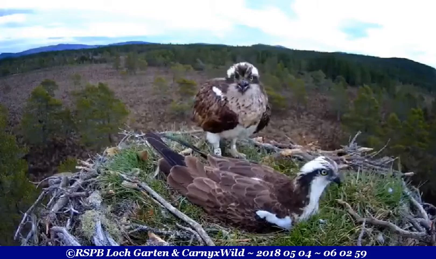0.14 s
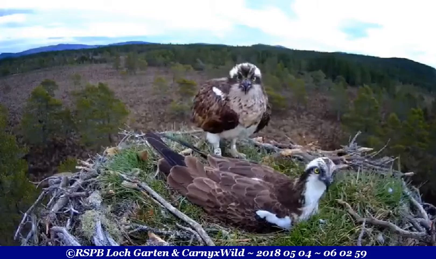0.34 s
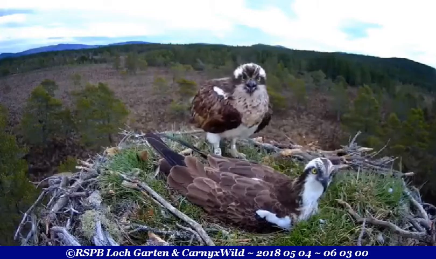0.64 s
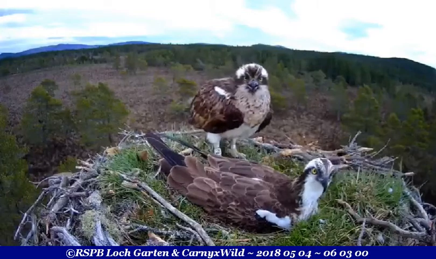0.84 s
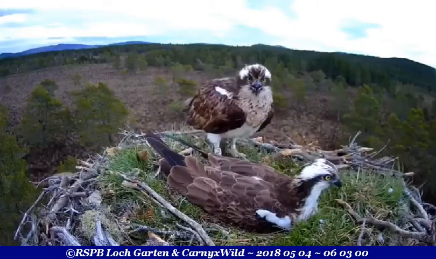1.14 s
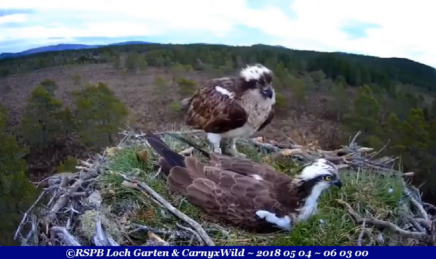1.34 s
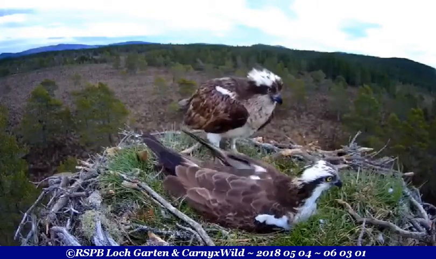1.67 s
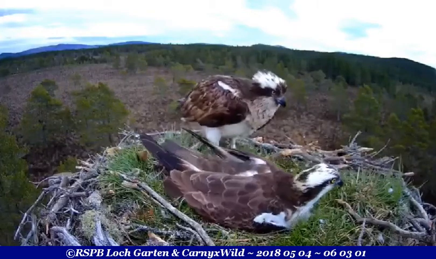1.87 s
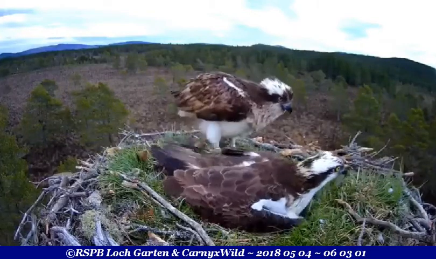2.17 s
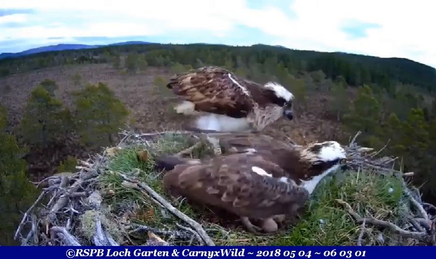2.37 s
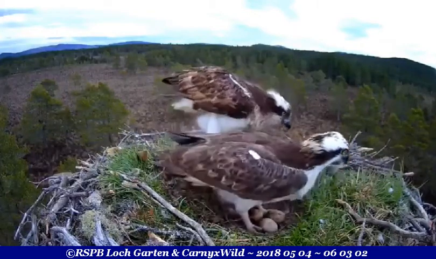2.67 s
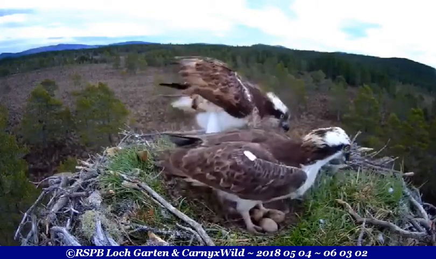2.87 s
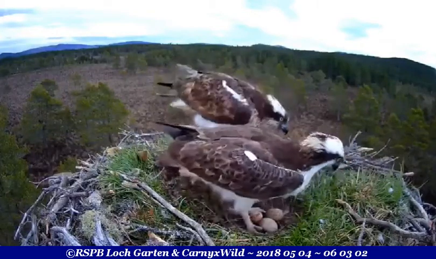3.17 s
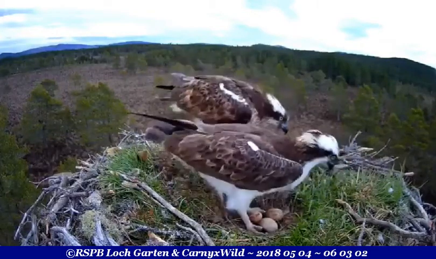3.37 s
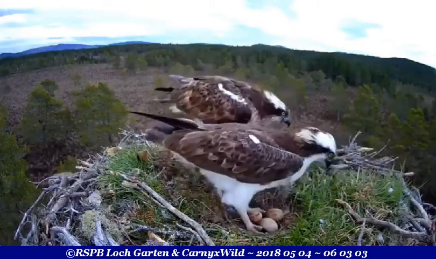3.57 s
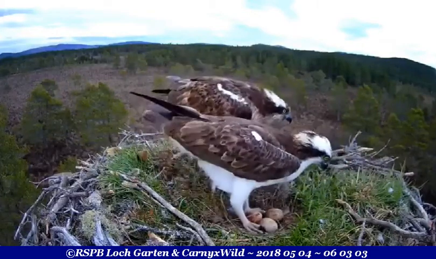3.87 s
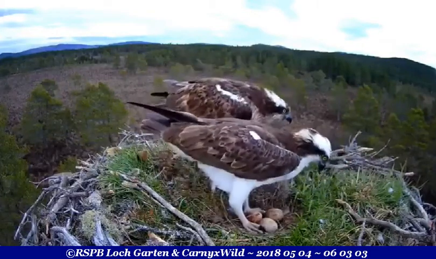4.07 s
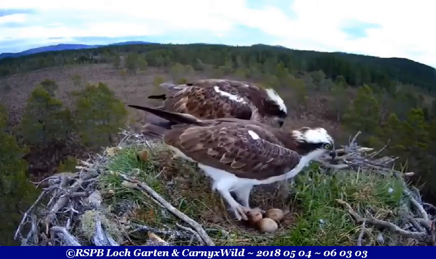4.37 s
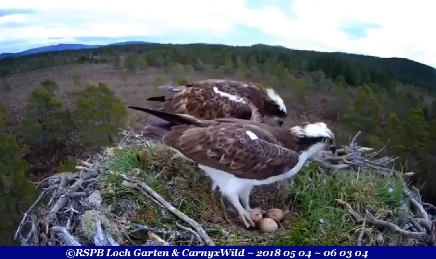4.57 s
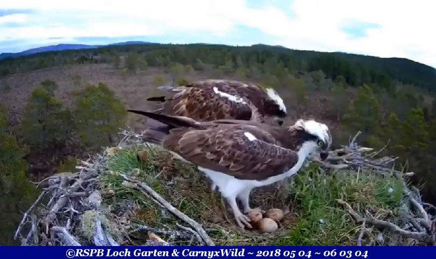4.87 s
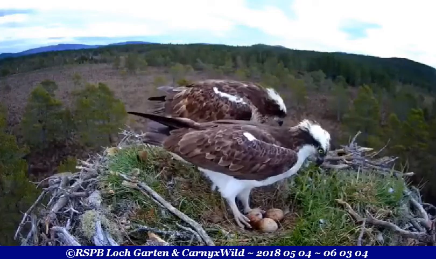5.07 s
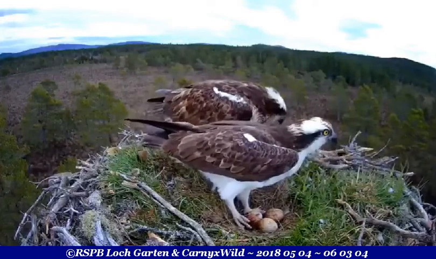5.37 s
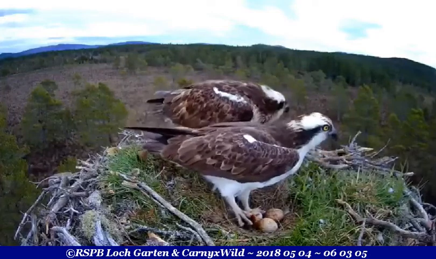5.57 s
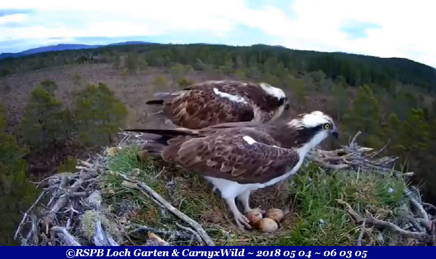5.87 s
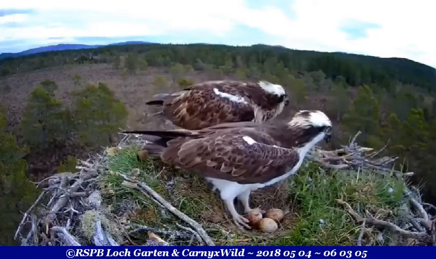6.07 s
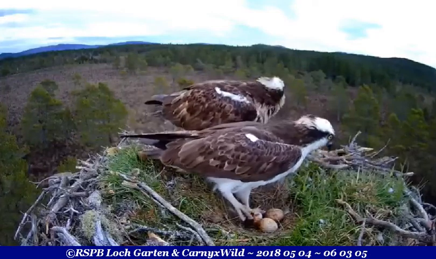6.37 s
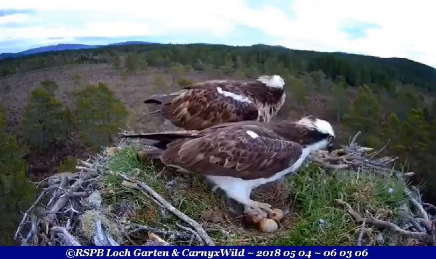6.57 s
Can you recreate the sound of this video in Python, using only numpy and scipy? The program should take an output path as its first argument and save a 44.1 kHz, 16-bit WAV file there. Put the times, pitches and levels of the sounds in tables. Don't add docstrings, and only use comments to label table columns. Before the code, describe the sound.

Short loud bird pips fade into strained little chirps, then distant sliding whistles echo among trees over steady low buzz, rumble and thin electronic whine.

```python
import sys
import numpy as np
from scipy import signal
from scipy.fft import rfft, irfft, next_fast_len
from scipy.io import wavfile
from scipy.ndimage import uniform_filter1d, map_coordinates

SR = 44100
rng = np.random.default_rng(int(sys.argv[2]) if len(sys.argv) > 2 else 0)


def voltage_ratio(decibels):
    exponent = np.asarray(decibels, float) / 20
    return 10 ** exponent


def unload_audio(sound):
    columns = np.transpose(np.atleast_2d(sound))
    steps = np.round(np.clip(columns, -1, 1) * 32767)
    wavfile.write(sys.argv[1], SR, steps.astype(np.int16))


N = 295911
TIME = np.arange(N) / SR

# t/s, level/dB
BACKGROUND_GAIN = [(0, 0.5), (.2, -1), (.6, -0.5), (.9, -2), (1.3, -1.5), (2.5, -1), (3.8, -0.5), (4.6, 0),
                   (6.71, 1.5)]


def unit(x):
    return x / np.sqrt(np.mean(x ** 2) + 1e-20)


def curve(rows):
    return np.interp(TIME, *np.transpose(rows))


def wobble(rate_hz):
    knots = rng.standard_normal(int(N * rate_hz / SR) + 4)
    return map_coordinates(knots, [TIME * rate_hz])


def noise(spectrum):
    m = next_fast_len(N)
    hz, db = np.transpose(spectrum)
    log_hz = np.log(np.fft.rfftfreq(m, 1 / SR) + 1)
    gain = voltage_ratio(np.interp(log_hz, np.log(hz), db))
    return unit(irfft(rfft(rng.standard_normal(m)) * gain, m)[:N])


def rumble_and_hiss():
    # f/Hz, level/dB per Hz
    line_noise = [(25, -22), (60, -28.5), (110, -3.5), (220, 5), (400, -1.5), (650, -10.5), (1500, -14.5),
                  (5000, -15.5), (15700, -16.5)]
    level_db = -44.0 + curve(BACKGROUND_GAIN) + 1.08 * wobble(3.21)
    return voltage_ratio(level_db) * noise(line_noise)


def mains_buzz():
    # multiple of the mains frequency, level/dB
    harmonics = [(1, -66), (2, -66.5), (3, -62), (4, -52), (5, -55.5), (6, -54.5), (7, -57.5), (8, -61.5),
                 (9, -79), (12, -101), (18, -70), (20, -64)]
    drift = wobble(12)
    buzz = np.zeros(N)
    for k, db in harmonics:
        level_db = db + .6 * np.log(k) * np.roll(drift, rng.integers(N))
        buzz += voltage_ratio(level_db) * np.sin(2 * np.pi * (50.02 * int(k) * TIME + rng.random()))
    return np.sqrt(2) * buzz


def scan_whistle():
    # t/s, level/dB
    whistle_level = [(0, -46), (.5, -50), (1.3, -58), (2.3, -51), (3, -47), (3.7, -44), (4.1, -46),
                     (4.6, -52), (5.2, -46), (5.9, -43), (6.71, -47)]
    scan = np.sin(2 * np.pi * 15625 * TIME) + voltage_ratio(-19) * np.sin(2 * np.pi * 15725 * TIME)
    shimmer_db = 1.2 * wobble(45)
    return np.sqrt(2) * voltage_ratio(curve(whistle_level) + 1 + shimmer_db) * scan


def microphone_hiss():
    # f/Hz, level/dB per Hz
    mic_noise = [(300, -12), (1000, -3.5), (2500, -1.5), (6000, -0.5), (12000, 0.5), (15700, -2)]
    level_db = curve(BACKGROUND_GAIN) - 40.5 + 1.27 * wobble(17)
    return voltage_ratio(level_db) * noise(mic_noise)


def whistles(notes, overtones, round_s, beats=()):
    # f/Hz, level/dB
    beak_colour = [(3500, 2), (4300, 1.5), (4950, -1), (5300, -10), (6900, -13), (7650, 8.5), (8400, -2),
                   (11000, -0.5)]
    # t/s, level/dB
    facing = [
        (1.35, -1.2),
        (1.45, -17),
        (1.6, -17),
        (1.9, -8),
        (5.5, -11),
        (6.05, -19),
    ]
    out = np.zeros(N + SR)
    span = max(int(round_s * SR), 1)
    for note in notes:
        s, hz, db = np.transpose(note)
        t = np.arange(s[0] - .002, s[-1] + 0.0052, 1 / SR)
        pitch = uniform_filter1d(np.interp(t, s, hz), 2 * span, mode="nearest")
        size = uniform_filter1d(np.interp(t, s, voltage_ratio(db / 2)), span, mode="nearest") ** 2
        phase = 2 * np.pi * (np.cumsum(pitch) / SR + rng.random())

        shake = unit(uniform_filter1d(rng.standard_normal(len(t)), size=150))
        pair = np.zeros(len(t))
        for start, length, membrane_hz, unsteady_hz, beat_db in beats:
            fade = np.clip(np.minimum(t - start, start + length - t) / 0.0032, 0, 1)
            offset_hz = pitch - membrane_hz + unsteady_hz * shake
            pair += 2 * voltage_ratio(beat_db) * fade * np.sin(2 * np.pi * np.cumsum(offset_hz) / SR)

        lumps = voltage_ratio(2.8 * unit(uniform_filter1d(rng.standard_normal((2, len(t))), size=260)))
        lumps *= 1 + .38 * unit(uniform_filter1d(rng.standard_normal((2, len(t))), size=45))
        tone = np.sin(phase)
        facing_db = np.interp(t, *np.transpose(facing))
        for k, overtone_db, growth in overtones:
            colour_db = np.interp(k * pitch, *np.transpose(beak_colour))
            level = voltage_ratio(overtone_db + facing_db + colour_db) * size ** growth
            tone += level * lumps[int(k) % 2] * np.sin(int(k) * phase)

        edges = np.clip(np.minimum(t - t[0], t[-1] - t) / 0.00077, 0, 1)
        sound = np.sqrt(2) * (size * edges * tone + pair * np.sin(phase))
        out[int(t[0] * SR):][:len(t)] += sound
    return out[:N]


def peeps():
    # t/s, length/s,
    # first f/Hz, last f/Hz, level/dB
    peep_rows = [(0.097, 0.022, 2550, 2850, -40), (0.112, 0.016, 3340.0, 3350.0, -38.1),
                 (0.167, 0.014, 2750, 3030, -19), (0.188, 0.014, 2850, 2950, -35),
                 (0.2, 0.013, 2800, 2450, -38), (0.322, 0.023, 2500.0, 2830.0, -31.2),
                 (0.342, 0.016, 3400.0, 3320.0, -39.9), (0.398, 0.012, 4050.0, 4100.0, -32.7),
                 (0.412, 0.013, 2750.0, 2980.0, -31.2), (0.552, 0.016, 2610.0, 2720.0, -43.9),
                 (0.572, 0.014, 3330.0, 3230.0, -38.4), (0.77, 0.022, 2670.0, 2750.0, -39.0),
                 (0.99, 0.022, 2750.0, 2680.0, -41.0), (1.019, 0.013, 3150, 2950, -31),
                 (1.242, 0.016, 3230.0, 2900.0, -39.8), (1.468, 0.012, 3140.0, 2630.0, -34.0),
                 (5.035, 0.017, 2650.0, 2510.0, -36.5), (5.662, 0.014, 4040.0, 3830.0, -36.8),
                 (5.872, 0.01, 4190.0, 4040.0, -39.4), (6.117, 0.011, 2620.0, 2240.0, -35.5),
                 (6.232, 0.024, 2760.0, 2700.0, -42.3), (6.66, 0.025, 2570.0, 2700.0, -40.1),
                 (.619, .01, 4250, 3950, -34), (.627, .024, 2400, 1900, -38),
                   (.648, .012, 2500, 2550, -42), (.843, .009, 4150, 4050, -27),
                   (.849, .01, 3500, 3450, -33), (.853, .01, 2500, 2350, -31),
                   (1.066, .01, 4200, 4050, -29), (1.067, .007, 3600, 3550, -31),
                   (1.074, .01, 3550, 3450, -30), (1.08, .017, 3450, 3300, -37),
                   (1.093, .014, 2700, 2450, -33), (1.293, .008, 2900, 2950, -27),
                   (1.301, .01, 2550, 2550, -29), (1.31, .015, 3500, 3400, -41),
                   (1.526, .011, 2650, 2450, -32), (1.536, .009, 2550, 2500, -34),
                   (1.545, .012, 2500, 2450, -38), (1.763, .008, 2850, 2900, -38),
                   (1.77, .016, 3000, 3300, -38), (1.761, .01, 4450, 4050, -40),
                   (1.776, .008, 2550, 2550, -41), (1.793, .012, 2550, 2450, -41),
                   (2.004, .009, 4600, 4300, -41), (2.02, .009, 2600, 2450, -40),
                   (.169, .01, 5650, 5800, -40), (.397, .008, 2900, 2900, -35),
                   (.408, .009, 1900, 2000, -40), (6.068, .008, 2250, 2400, -25),
                   (5.858, .01, 2600, 2350, -36), (5.268, .014, 3700, 3760, -25),
                   (3.459, .01, 5900, 5700, -46), (3.766, .016, 2050, 1400, -45),
                   (4.443, .024, 4450, 4050, -36)]
    # t/s, peak level/dB
    tick_rows = [(0.0842, -33.5), (0.3142, -31.5), (0.4, -34.5), (0.537, -32), (0.7587, -33.5), (0.98, -37)]
    notes = []
    for s, length, first_hz, last_hz, db in peep_rows:
        middle = (s + length / 2, (first_hz + last_hz) / 2, db)
        notes.append([(s, first_hz, db - 16), middle, (s + length, last_hz, db - 16)])
    out = whistles(notes, [], round_s=0.0016)
    t = np.arange(SR // 50) / SR
    for s, db in tick_rows:
        decay = voltage_ratio(db + 4.0 - 60 * t / 0.013)
        out[round(s * SR):][:len(t)] += decay * np.sin(2 * np.pi * 1900 * t * (1 + 30 * t))
    return out


def shaped(rows, shape):
    break_hz, closing_s = 1751, .0105
    notes = []
    for start, length, top_hz, held_db, closing_db in rows:
        points = [p for p in shape[0] if p[0] < length - closing_s]
        points += [(length - s, *rest) for s, *rest in shape[1] if length - s > points[-1][0]]
        note = []
        for s, rise, lean, db in sorted(points):
            hz = break_hz + rise * (top_hz - break_hz)
            note.append((start + s, hz, held_db + lean * (closing_db - held_db) + db))
        notes.append(note)
    return notes


def pipes():
    # start t/s, length/s, top f/Hz, held level/dB, closing level/dB
    loud = [(.813, .034, 2490, -9, -2), (3.737, 0.04, 2510, -38, -40.5)]
    broken = [(4.851, 0.033, 2320, -51, -24), (5.05, 0.036, 2500, -25, -21.5),
              (5.254, 0.027, 2500, -23.5, -20)]
    clipped_notes = [(5.456, 0.019, 2234, -24, -20.5), (5.649, 0.025, 2246, -30, -19.5),
                     (5.866, 0.0154, 2200, -20, -20.5)]
    soft = [(6.0685, 0.027, 2417, -31, -16), (6.2745, 0.03, 2400, -25.5, -16.5),
            (6.484, 0.032, 2406, -27.5, -14.5), (6.699, 0.027, 2390, -24, -15)]
    # t/s, share of the way from break pitch to top, share from held to closing level, extra level/dB
    loud_shape = ([(0, 0.76, 0, -27), (.003, 0.66, 0, -18), (.005, 1, 0.012, 1), (.009, 0.91, 0, 0.5)],
                  [(.015, 0.96, 0, -3), (0.0078, 0.54, 0.97, -0.5), (0.0049, 0.56, 0.88, -1.4),
                  (0.004, 0.23, 0.92, -3.5), (0.00011, 0.19, 0.91, -42)])
    broken_shape = ([(0, 0.41, 1, -25), (.004, 0.4, 1, -6.5), (.0075, .93, .3, -9), (.012, 0.85, 0, -1.5)],
                    [(0.0104, 1, 0, 2), (.008, 0.78, 0.93, -11), (0.0053, 0.46, 0.97, -1.5),
                    (0.0034, 0.38, 0.84, 2.5), (0.00022, 0.13, 1, -24)])
    clipped_shape = ([(0, 1, 0, -16), (.003, .95, 0, -0.5)], [(0.0082, 0.82, 0.94, -1),
                     (0.0043, 0.63, 1, 1.5), (0.00074, 0.025, 1, -28)])
    soft_shape = ([(0, 0.55, 0, -19), (.004, 0.76, 0, 3.5), (.008, 1, 0, 2)], [(0.0176, 0.89, 0.05, 1.5),
                  (0.0086, 0.67, 0.97, 0.4), (0.0043, 0.57, 0.99, 0.5), (0.0021, 0, 0.9, -26)])
    # t/s, f/Hz, level/dB
    opener = ([(.1475, 2400, -38), (.151, 2350, -22), (.154, 2300, -4), (.157, 2260, -1.5),
              (.162, 2160, -1.5)], [(.166, 2060, -2.5), (.1685, 1930, -4), (.170, 1820, -18),
              (.1725, 1700, -36)])
    stepped = ([(.592, 2450, -38), (.596, 2350, -24), (.5985, 2400, -7), (.604, 2510, -7),
               (.612, 2480, -6)], [(.6145, 2330, -5.5), (.6162, 2270, -3), (.6205, 2080, -2.5),
               (.6218, 1950, -12), (.6235, 1850, -15), (.627, 1750, -34)])
    wavering = ([(1.030, 2700, -42), (1.0345, 2550, -27), (1.0365, 2350, -25), (1.039, 2380, -10.5),
                (1.043, 2510, -9), (1.047, 2540, -12), (1.052, 2540, -14), (1.055, 2540, -12),
                (1.0575, 2570, -15)], [(1.060, 2480, -12.5), (1.0635, 2320, -6.5), (1.065, 2200, -8.5),
                (1.0672, 2080, -4), (1.070, 1870, -17), (1.073, 1700, -34)])
    scooped = ([(1.261, 2520, -40), (1.2635, 2470, -28), (1.2655, 2430, -16), (1.2685, 2490, -13.5),
               (1.272, 2570, -17.5), (1.278, 2630, -19.5), (1.282, 2600, -18.5)], [(1.286, 2510, -13.5),
               (1.290, 2320, -7.5), (1.2915, 2180, -9.5), (1.2935, 2060, -7.5), (1.296, 1900, -28),
               (1.298, 1800, -42)])
    fading = ([(1.481, 2450, -40), (1.484, 2250, -28), (1.4865, 2270, -13), (1.4895, 2420, -17),
              (1.492, 2430, -13), (1.500, 2540, -18), (1.506, 2630, -21)], [(1.514, 2500, -13),
              (1.520, 2100, -9), (1.5225, 1850, -36)])
    high_arch = ([(1.7075, 2050, -45), (1.712, 2190, -14.5), (1.7165, 2400, -25), (1.7195, 2440, -21),
                 (1.7235, 2650, -38), (1.727, 2950, -29), (1.730, 3080, -33), (1.7335, 3100, -29),
                 (1.737, 3080, -37)], [(1.745, 3180, -34), (1.752, 3150, -31), (1.7555, 3000, -23),
                 (1.7575, 2650, -30), (1.761, 2350, -15), (1.764, 2120, -19), (1.7655, 2050, -16),
                 (1.769, 1850, -45)])
    low_arch = ([(1.9585, 2050, -45), (1.962, 2190, -16), (1.965, 2360, -21.5), (1.970, 2410, -17),
                (1.973, 2460, -19), (1.9765, 2650, -42), (1.980, 2910, -27), (1.986, 2970, -29)],
                [(1.998, 2960, -30), (2.0005, 2900, -25), (2.003, 2650, -33), (2.007, 2320, -16.5),
                (2.009, 2180, -20), (2.011, 2060, -15.5), (2.0135, 1950, -31), (2.016, 2000, -33),
                (2.019, 1950, -46)])
    wide_arch = ([(2.212, 2030, -45), (2.218, 2110, -18.5), (2.223, 2230, -22), (2.227, 2300, -39),
                 (2.230, 2450, -27), (2.234, 2700, -40), (2.238, 2850, -52), (2.244, 3130, -38),
                 (2.250, 3200, -46)], [(2.262, 3150, -49), (2.270, 3200, -40), (2.274, 3100, -42),
                 (2.2755, 2750, -36), (2.278, 2460, -25), (2.2805, 2250, -29), (2.283, 2130, -21),
                 (2.2865, 1950, -44)])
    last_arch = ([(2.5115, 1950, -46), (2.517, 2080, -22.5), (2.523, 2230, -28), (2.5275, 2380, -40),
                 (2.531, 2460, -28), (2.535, 2550, -37), (2.538, 2750, -50), (2.541, 2850, -39),
                 (2.546, 2980, -47)], [(2.56, 3120, -46), (2.571, 3150, -35), (2.574, 2800, -40),
                 (2.577, 2430, -26), (2.580, 2200, -33), (2.582, 2120, -23), (2.586, 1950, -45)])
    notes = shaped(loud, loud_shape) + shaped(broken, broken_shape)
    notes += shaped(clipped_notes, clipped_shape) + shaped(soft, soft_shape)
    own = [opener, stepped, wavering, scooped, fading, high_arch, low_arch, wide_arch, last_arch]
    return notes + [[*opening, *closing] for opening, closing in own]


def rasps(notes):
    out = np.zeros(N + SR)
    t = np.arange(SR // 16) / SR
    centre_hz = 2450 + 1300 * np.exp(-t / 0.016)
    phase = 2 * np.pi * np.cumsum(centre_hz) / SR
    puff = voltage_ratio(-60 * t / 0.084) * (1 - np.exp(-t / 0.002))
    puff += 0.21 * np.exp(-((t - .03) / 0.0035) ** 2)
    for note in notes:
        grain = uniform_filter1d(rng.standard_normal((2, len(t))), size=26)
        grain = unit(uniform_filter1d(grain, size=26))
        band = grain[0] * np.cos(phase) + grain[1] * np.sin(phase)
        effort_db = max(db for s, hz, db in note[-4:])
        start = round((note[-1][0] - .006) * SR)
        out[start:][:len(t)] += voltage_ratio(effort_db - 26) * puff * band
    return out[:N]


def near_bird():
    # multiple, level/dB, exponent of growth with effort
    overtones = [(2, -27, -0.32), (3, -42, -0.7), (4, -42, 0.5)]
    # t/s, length/s, f/Hz, unsteadiness/Hz, level/dB
    beat_rows = [
        (1.733, 0.023, 2430, 170, -35.5),
        (1.983, 0.021, 2380, 170, -35.5),
        (2.25, .022, 2300, 220, -45),
        (2.552, .02, 2220, 200, -48),
    ]
    notes = pipes()
    piping = whistles(notes, overtones, round_s=0.00098, beats=beat_rows)
    return piping * voltage_ratio(0.16) + rasps(notes) + peeps()


def thump():
    return voltage_ratio(-39.5) * np.exp(-((TIME - .162) / 0.00398) ** 2)


def echo(x, delay_s, t60):
    out = np.zeros(N + 2 * SR)
    step = SR // 16
    t = np.arange(int(min(t60, .5) * SR)) / SR
    for start in range(0, N, step):
        tail = rng.standard_normal(len(t)) * voltage_ratio(-60 * t / t60) * (t > delay_s)
        wet = signal.fftconvolve(x[start:start + step], tail / np.linalg.norm(tail))
        out[start:start + len(wet)] += wet
    return out[:N]


def nest_echo(near):
    rim_s = 0.023
    nest = voltage_ratio(-29.0) * echo(near, delay_s=0.0039, t60=0.045)
    nest += voltage_ratio(-42.5) * echo(near, delay_s=.03, t60=0.96)
    return nest + voltage_ratio(-39.5) * np.roll(near, round(rim_s * SR)) * (TIME > rim_s)


def link():
    # start t/s, number of packets
    lost_rows = [(.376, 1), (.880, 2), (1.5042, 1), (2.1041, 1), (2.7041, 1), (3.3043, 1), (3.5441, 1),
                 (3.9044, 1), (4.3844, 1), (4.4806, 1), (4.7446, 1), (5.2243, 1), (5.6328, 1), (6.425, 1)]
    packet_s = .0238
    lost = sum((TIME > start) & (TIME < start + packets * packet_s) for start, packets in lost_rows)
    return uniform_filter1d(1. - lost, size=7)


def slides():
    # start t/s, length/s, pitch ratio, level/dB
    tall_spike = [(0, 5640, -5), (.017, 5840, 1), (.032, 7000, -1), (.051, 4720, -1), (.064, 4510, 4.5),
                  (.083, 4240, -6)]
    tall_spikes = [(3.593, 0.081, 1.001, -40.5)]
    spike = [(0, 5600, -23), (.009, 5740, 1.5), (.023, 6540, -10.5), (.032, 6280, -13), (.037, 5750, .2),
             (.046, 4900, -3), (.061, 4560, 3), (.078, 4360, 1.5), (.087, 4400, -23)]
    spikes = [(3.773, 0.079, 0.99, -34), (3.963, 0.079, 1.008, -29.5)]
    tall_hook = [(0, 3200, -20), (.008, 3640, -10), (.016, 4010, -2.5), (.04, 3520, -2), (.053, 3400, -4),
                 (.064, 3960, 0), (.076, 4370, -2), (.09, 4550, 0.5), (.13, 4680, -14)]
    tall_hooks = [(4.13, .125, 1.001, -25)]
    hook = [(0, 3107, -22), (.019, 3825, 0.5), (.042, 3520, -1.5), (.055, 3450, -6), (.064, 3920, 3.5),
            (.076, 4380, -3.3), (.097, 4560, 0.5), (.124, 4620, -6), (.13, 4640, -10)]
    hooks = [(4.327, 0.11, .995, -23.5), (4.525, 0.13, 1.001, -23.5)]
    falling = [(0, 4900, -30), (.016, 4550, -2.5), (.027, 4410, -1), (.056, 4150, -6.5), (.085, 4090, 1.5),
               (.108, 3960, 1.5), (.125, 3480, -1), (.144, 2820, -4.5), (.165, 2260, -22)]
    fallings = [(4.7251, 0.1423, 1.001, -25), (4.9545, 0.163, 1.001, -26)]
    hump = [(0, 3010, -14), (.039, 2764, -1.5), (.065, 3110, 2), (.076, 3486, 2.5), (.09, 3764, 5.5),
            (.103, 3500, 0), (.114, 3060, 0.5), (.132, 2700, -8), (.14, 2540, -21)]
    humps = [(5.185, 0.134, 1.001, -30), (5.396, 0.14, 1.001, -31.5)]
    reply = [(0, 2813, -12), (.01, 2883, -0.8), (.027, 2590, -5), (.038, 2430, -26)]
    replies = [(5.284, 0.036, 0.96, -29.5), (5.475, 0.037, 1.01, -24.5), (5.675, 0.028, .98, -22.5),
               (5.881, 0.044, 0.99, -29.5)]
    rising = [(0, 2436, -19), (.01, 2596, -8.5), (.028, 2710, 1.5), (.074, 2760, 0), (.102, 2900, -11),
              (.134, 3120, 2), (.154, 3410, -3), (.172, 3560, -4), (.205, 3800, -21)]
    risings = [(5.606, 0.057, 1.045, -23), (5.758, .205, 1.001, -31.5)]
    scrap = [(0, 4580, -12), (.006, 4525, 2), (.019, 4440, -5), (.032, 4450, -12)]
    scraps = [(3.48, .032, 1.001, -39.5), (5.311, .03, .82, -37)]
    # f/Hz, width/Hz, depth/dB
    holes = [(3360, 120, -25), (3630, 78, -11), (4150, 43, -10), (4730, 170, -19), (6070, 170, -21),
             (2660, 64, -4), (3200, 53, -8), (5350, 150, -14), (6600, 180, -14)]
    song = [(tall_spike, tall_spikes), (spike, spikes), (tall_hook, tall_hooks), (hook, hooks),
            (falling, fallings), (hump, humps), (reply, replies), (rising, risings), (scrap, scraps)]
    notes = []
    for figure, rows in song:
        s, hz, db = np.transpose(sorted(figure))
        for start, length, ratio, level_db in rows:
            points = [p for p in zip(s[:-1], hz, db) if p[0] < length]
            points.append((length, np.interp(length, s, hz), db[-1]))
            notes.append([(start + a, ratio * b, level_db + c) for a, b, c in points])
    m = next_fast_len(N)
    f = np.fft.rfftfreq(m, 1 / SR)
    path = np.ones(len(f), complex)
    for centre, width, depth_db in holes:
        detuning = centre * centre - f * f
        path *= (detuning + 1j * f * width * voltage_ratio(depth_db)) / (detuning + 1j * f * width)
    return irfft(rfft(whistles(notes, [], round_s=0.0012), m) * path, m)[:N]


def tree_echo(far):
    stirred = far * unit(wobble(260))
    trees = voltage_ratio(-6.0) * echo(far, delay_s=0.0022, t60=0.049)
    trees += voltage_ratio(-14.5) * echo(stirred, delay_s=0.0066, t60=0.94)
    trees += voltage_ratio(-17.0) * echo(far, delay_s=0.013, t60=0.27)
    return trees + voltage_ratio(-18.5) * np.roll(far, round(.036 * SR))


def scene():
    near = near_bird()
    far = slides()
    microphone = near + far + nest_echo(near) + tree_echo(far) + microphone_hiss()
    cable = rumble_and_hiss() + mains_buzz() + scan_whistle()
    return (microphone * link() + cable + thump())[None]


def low_pass(x):
    return signal.sosfilt(signal.butter(12, 16150, fs=SR, output="sos"), x)


def record(dry):
    clipped = dry / (1 + np.abs(dry / 1.02) ** 16) ** (1 / 16)
    top_hz = 15780
    m = next_fast_len(N)
    passed = irfft(rfft(clipped, m) * (np.fft.rfftfreq(m, 1 / SR) < top_hz), m)[:, :N]
    return low_pass(passed)


dry = scene()
out = record(dry)
unload_audio(out)
```